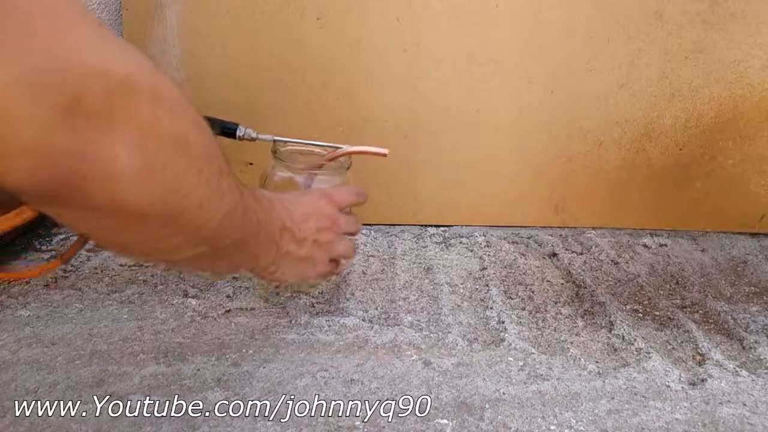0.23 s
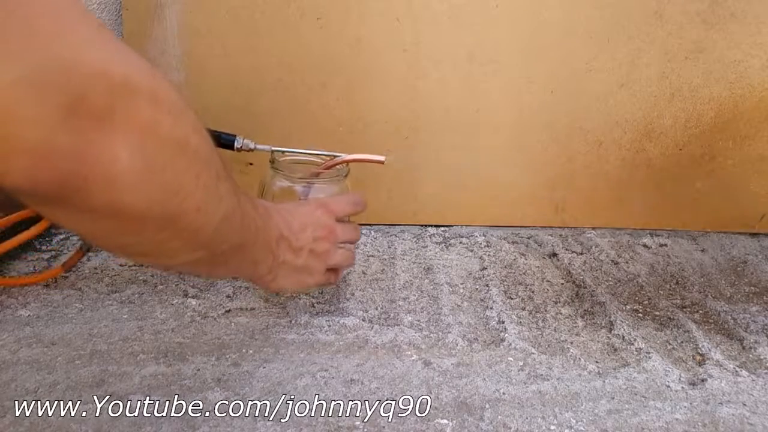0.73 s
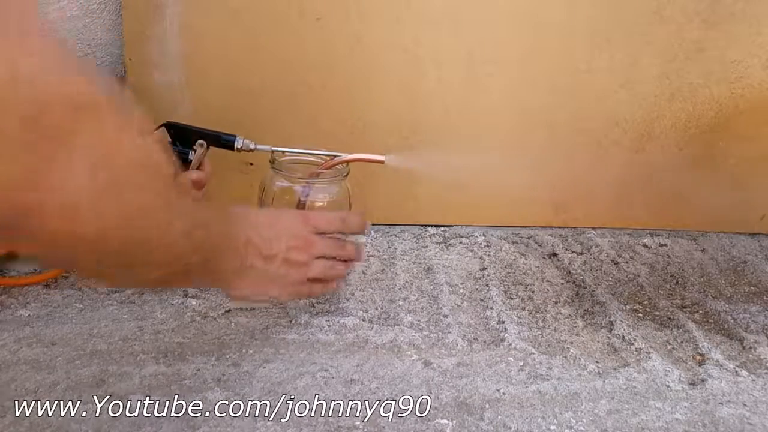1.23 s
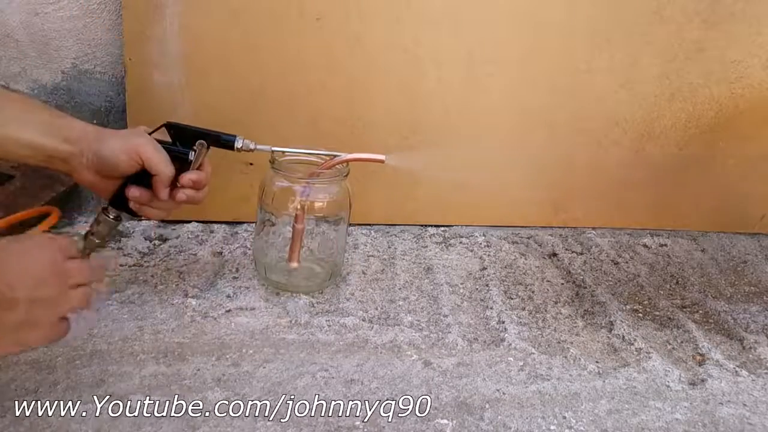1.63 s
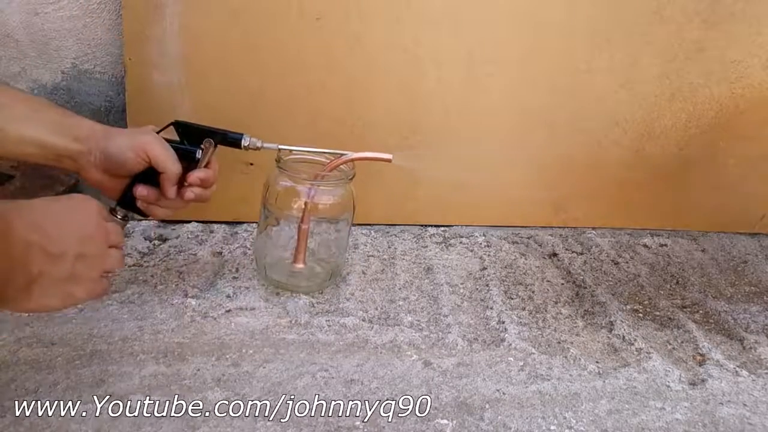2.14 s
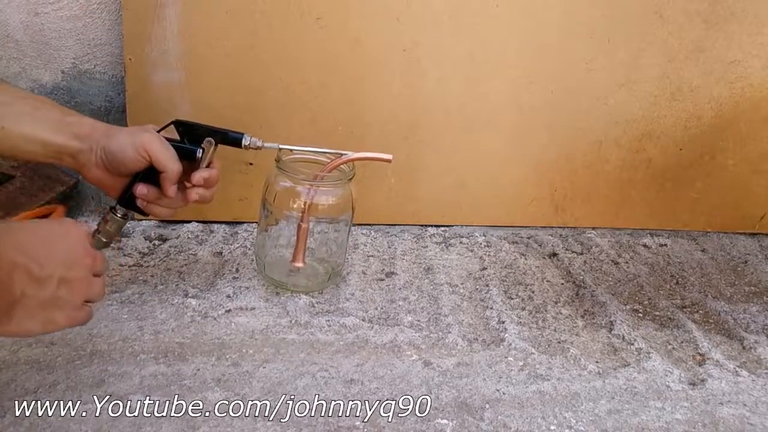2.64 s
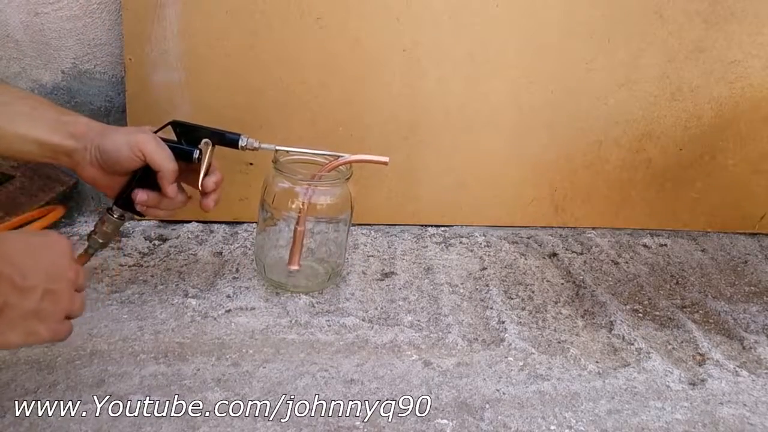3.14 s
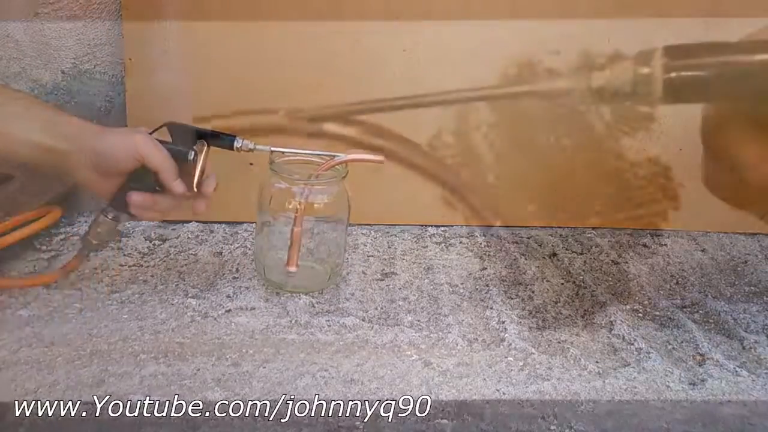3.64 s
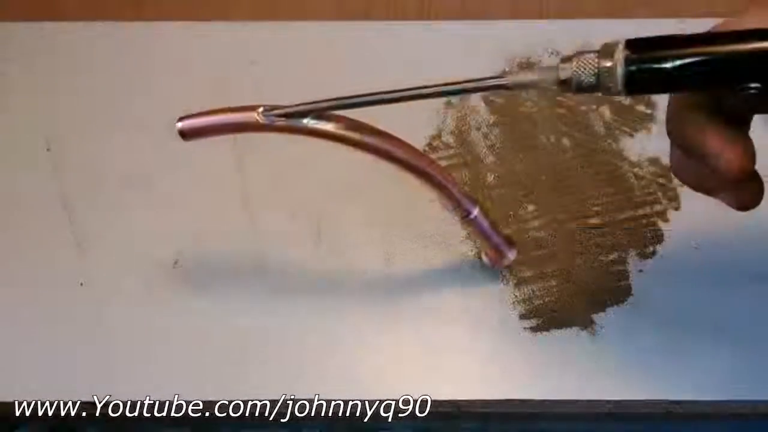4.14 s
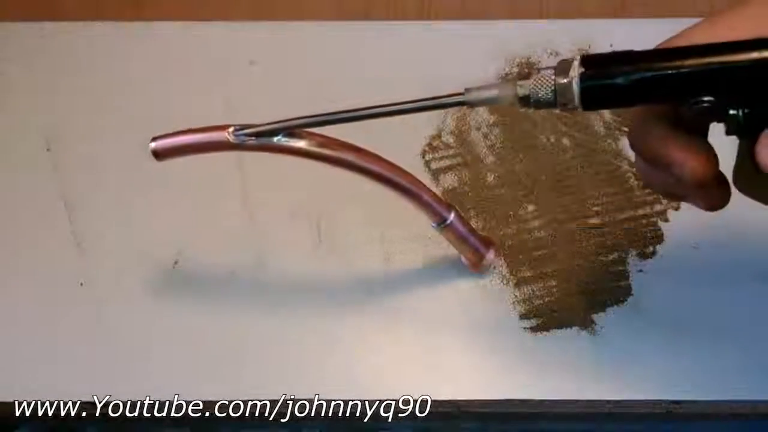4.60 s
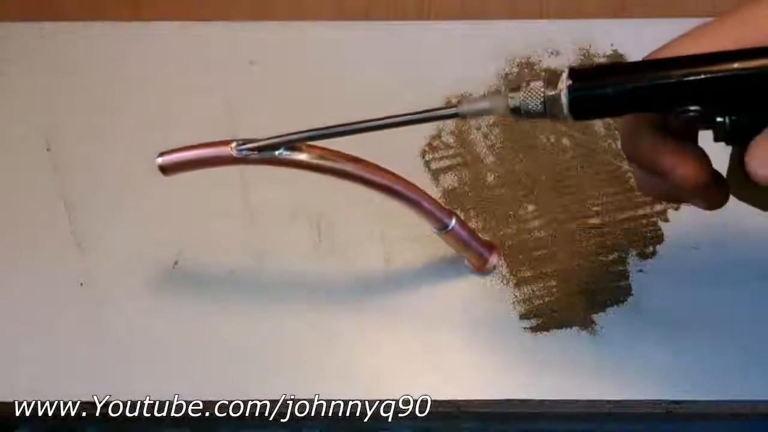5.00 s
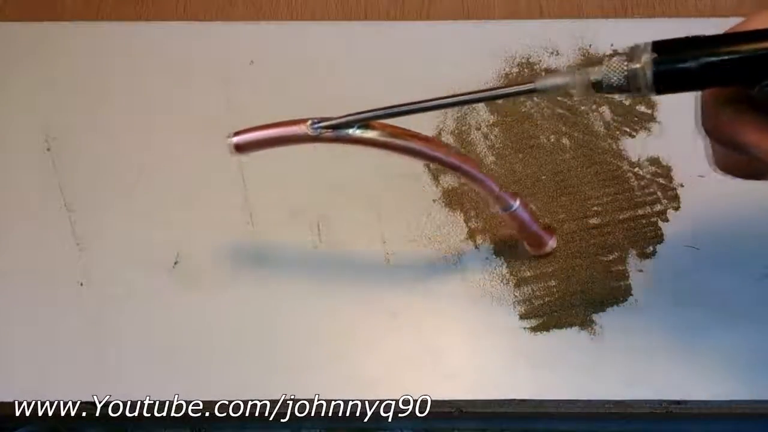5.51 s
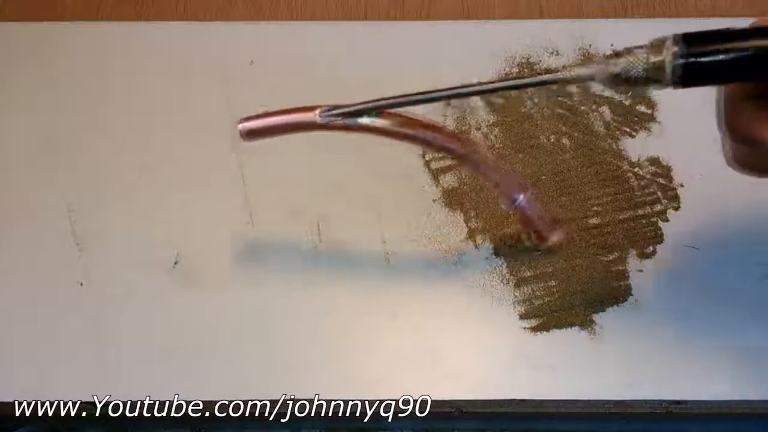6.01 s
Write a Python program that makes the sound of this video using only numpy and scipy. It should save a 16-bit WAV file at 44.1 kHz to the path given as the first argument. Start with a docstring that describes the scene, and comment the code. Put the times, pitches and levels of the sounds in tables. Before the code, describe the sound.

Stop-start air gun hiss with wet gurgle and valve thumps, a quiet gap of distant traffic and birds, then a singing jet swelling into full, buffeting hiss.

```python
"""In a yard, six pulls of an air gun blow through a bent copper tube that sucks water from a glass jar.
Filtered noise makes hiss, gurgle, rasp and mist; decaying sines make the thump and ring of each shut valve.
Between and after the last pulls come far bird chirps, swept sines, and a small tick; then the yard fades to a bench.
There the same tube sucks powder: its jet grows from singing to full hiss, and eddies jolt the left port.
Traffic noise and an engine drone lie beneath; the gun sits at the left port, which overloads."""
import sys
import numpy as np
from scipy import signal
from scipy.fft import rfft, irfft, next_fast_len
from scipy.io import wavfile
from scipy.ndimage import uniform_filter1d, map_coordinates

SR = 44100
rng = np.random.default_rng(int(sys.argv[2]) if len(sys.argv) > 2 else 0)


def unload_wav(signal):
    """Save mono or channel-first audio to the path in sys.argv[1] as 16-bit WAV at rate SR, clipped to [-1, 1]."""
    wavfile.write(
        sys.argv[1],
        SR,
        np.round(np.clip(np.atleast_2d(signal).T, -1, 1) * 32767).astype(np.int16),
    )


N = 276066
T = np.arange(N) / SR

# trigger pulls over the jar: valve opens t/s, valve shuts t/s, hose thump level/dB, glass ring level/dB
TRIGGER_PULLS = [(-.1, 0.056, -25, -46), (0.571, 0.812, -24.5, -25), (0.951, 2.508, -31.5, -41.5),
                 (2.701, 2.851, -23, -44), (2.892, 3.016, -22.5, -44), (3.073, 3.192, -23, -47.5)]


def amp(db):
    """Amplitude factor of a level in dB."""
    return 10 ** (np.asarray(db) / 20)


def unit(x):
    """Scale to rms 1 over all ports together."""
    return x / np.sqrt(np.mean(x ** 2) + 1e-20)


def along(points, hz):
    """Each column of (f/Hz, value, ..) points, interpolated on a log frequency axis."""
    f, *cols = np.transpose(points)
    return np.squeeze([np.interp(np.log(hz + 1), np.log(f + 1), c) for c in cols])


def curves(rows):
    """One value per sample for each column after the time."""
    s, *cols = np.transpose(rows)
    return [np.interp(T, s, c) for c in cols]


def wobble(rate):
    """A smooth random curve with rate knots a second."""
    return map_coordinates(rng.standard_normal(int(N * rate / SR) + 4), [T * rate])


def filtered(x, response):
    """Shape the spectrum of x by a response of frequency."""
    m = next_fast_len(N + SR // 2)
    spectrum = rfft(x, m) * response(np.fft.rfftfreq(m, 1 / SR))
    return irfft(spectrum, m)[..., :N]


def band(hz, centre_hz, width_hz):
    """Complex response of one resonance, peak gain 1."""
    return 1j * hz * width_hz / (centre_hz ** 2 - hz ** 2 + 1j * hz * width_hz)


def ringing(modes, t):
    """Sum of dying sines; each mode's strength varies at random from blow to blow."""
    ring = 0
    for hz, db, t60 in modes:
        level_db = db + rng.normal(0, 2.0) - 60 * t / t60
        ring = ring + amp(level_db) * np.sin(2 * np.pi * hz * t)
    return ring


def turbulence(alike, patchy_db, turn=0):
    """Patchy noise at two ports, more alike in the bass; the right lags by up to turn radians above it."""
    z = signal.stft(rng.standard_normal((2, N)), nperseg=512)[2]
    field = rng.standard_normal(z.shape[1:])
    field = uniform_filter1d(field, size=4, axis=0)  # patches spread over frequency
    field = uniform_filter1d(field, size=6, axis=1)  # and over time
    patchy = z * amp(patchy_db * unit(field))
    shared, separate = signal.istft(patchy, nperseg=512)[1][:, :N]

    like = lambda hz: np.clip(alike * (0.37 + .6 / (1 + (hz / 2300) ** 4)), 0, 1)
    lag = lambda hz: np.exp(-1j * turn / (1 + (1100 / (hz + 1)) ** 2.7))
    right = filtered(shared, lambda hz: like(hz) * lag(hz))
    right = right + filtered(separate, lambda hz: np.sqrt(1 - like(hz) ** 2))
    return np.array([shared, right])


def jet(colour, modes, noise, dull_db=0, thin_db=0):
    """Jet noise coloured by tube resonances, rms 1 at the left port; dull_db shifts the top, thin_db the bass."""
    rise = lambda hz: sum(np.outer(db, abs(band(hz, c, w)) ** 2) for c, w, *db in modes)
    top = lambda hz: dull_db / (1 + (12000 / (hz + 1)) ** 10)
    bass = lambda hz: thin_db / (1 + (hz / 3000) ** 4)
    x = filtered(noise, lambda hz: amp(along(colour, hz) + rise(hz) + top(hz) + bass(hz)))
    return x / np.std(x[0])


def valve(opens, shuts):
    """Air pressure 0-1: it builds when the valve opens and bleeds off when it shuts."""
    build_s, bleed_s = .0095, 0.0069
    up = 1 - np.exp(-(np.clip(T - opens, 0, 1) / build_s) ** 2)
    return up ** 2 * np.exp(-np.clip(T - shuts, 0, 1) / bleed_s)


def spray():
    """The air jet, water gurgling in jar and tube, a rasp where drops tear off and the fizz of the mist."""
    # jet colour at the ports: f/Hz, left relative level/dB, right relative level/dB
    colour = [(50, -43, -48), (300, -42, -36.5), (1010, -32, -30), (1530, -31, -31), (2790, -19.5, -31.5),
              (4530, -15, -28.5), (7000, -11.5, -26), (7830, -8, -25.5), (10100, -4, -23.5),
              (12500, -3, -23), (13300, -13, -18), (15350, -5.5, -16.5), (15820, -10, -21)]
    # tube resonances over the jar: f/Hz, width/Hz, left rise/dB, right rise/dB
    tube_modes = [(5700, 570, 4, 6.5), (7780, 110, 7.5, 3), (8795, 630, 7, -3.5), (10174, 1000, 7.5, -3),
                  (11100, 299, -1, -1.5), (12200, 440, 4, 1), (14400, 440, 5, -2)]
    # water in the tube, most in the long pull, less as the jar empties: t/s, rasp level/dB, mist level/dB
    water = [(0, -39.5, -33.5), (.58, -36.5, -32), (.65, -63, -40), (.81, -39, -29.5), (.96, -49, -31.5),
             (1.4, -43.5, -31.5), (1.6, -37, -30), (1.95, -34.5, -30.5), (2.5, -37, -36),
             (2.72, -41.5, -38.5), (3.2, -42, -41)]
    turn = 3.4  # radians by which the right port lags above the bass

    air = sum(valve(opens, shuts) for opens, shuts, *_ in TRIGGER_PULLS)
    rasp_db, mist_db = curves(water)

    cavity = lambda hz: band(hz, 521, 83) ** 2 + 0.34 * band(hz, 373, 60) ** 2
    uneven = amp(1.2 * wobble(30))
    gurgle = unit(uneven * filtered(turbulence(0.95, 0, turn=turn), cavity))

    tearing = lambda hz: band(hz, 1847, 239.5) ** 2
    rasp = unit(filtered(turbulence(0.96, 1.5, turn=2.9), tearing)) * amp([[6], [-1.5]])
    rasp = amp(rasp_db + 1.5 * wobble(14)) * rasp

    fizz = lambda hz: (abs(band(hz, 2410, 250)) ** 2
                       + 1.4 * abs(band(hz, 2890, 700)) ** 2
                       + 1.25 * abs(band(hz, 3560, 570)) ** 2)
    mist = unit(filtered(turbulence(0.71, 2.4, turn=turn), fizz)) * amp([[6], [-4]])

    hiss = jet(colour, tube_modes, turbulence(.8, 0.67, turn=turn))
    hiss = amp(-7.5 + 0.46 * wobble(29)) * hiss
    return air * (hiss + slugs() * gurgle + rasp + amp(mist_db) * mist)


def slugs():
    """Loudness of the gurgle: each water slug swells fast and dies slower over a steady simmer."""
    # water slugs that boom in the jar: t/s, peak level/dB
    booms = [(.03, -32), (.605, -36.5), (.81, -31), (1.035, -42.5), (1.165, -33.5), (1.275, -38),
             (1.375, -32.5), (1.543, -32), (1.63, -36.5), (1.695, -30), (1.84, -30.5), (2.02, -31),
             (2.18, -30), (2.235, -36), (2.43, -42), (2.755, -55.5), (2.915, -54.5), (3.02, -47),
             (3.19, -45.5)]
    rise_db_per_s, fall_db_per_s, simmer_db = 400, 169.5, -54.5
    s, db = np.transpose(booms)[:, :, None]
    slope = np.where(T < s, rise_db_per_s, fall_db_per_s)
    swells = amp(db - slope * abs(T - s))
    return np.sqrt(amp(simmer_db) ** 2 + np.sum(swells ** 2, axis=0))


def shutoff():
    """The closing valve thumps the hose and leaves the jar ringing, a little louder at the left port."""
    # thump modes of the hose: f/Hz, relative level/dB, t60/s
    hose_modes = [(194, -1.5, 0.11), (100.2, -4.5, 0.1), (30, -5.5, 0.082)]
    # ring modes of the glass jar: f/Hz, relative level/dB, t60/s
    glass_modes = [(565, -3, .2), (2374, -2, .18), (2410, -7, .09), (3900, -9, .1)]
    out, t = np.zeros(N + SR), np.arange(SR // 2) / SR
    onset = 1 - np.exp(-t / 0.0042)
    for _, shuts, thump_db, ring_db in TRIGGER_PULLS:
        thump = amp(thump_db) * ringing(hose_modes, t)
        ring = amp(ring_db) * ringing(glass_modes, t)
        out[round(shuts * SR):][:len(t)] += (thump + ring) * onset
    return out[:N] * amp([[1], [-1]])


def bench():
    """The dry jet grows from a singing low flow to a full hiss; each valve stage has its own resonances."""
    # powder jet colour at the ports: f/Hz, left relative level/dB, right relative level/dB
    colour = [(60, -34, -32), (300, -38, -28.5), (700, -26, -27.5), (1500, -22, -30), (3000, -15, -26.5),
              (5000, -12, -29), (6200, -10.5, -26), (8200, -4.5, -21), (10030, 1.5, -21.5),
              (12300, -4, -16), (13200, -5.5, -20), (15700, -10, -8)]
    # tube resonances at the bench: f/Hz, width/Hz, left rise/dB at low, middle and full flow, right rise/dB
    tube_modes = [(1950, 250, 12, 3, 0, 4), (3400, 450, 11, 4, 2, 3), (4620, 400, 10, 6, 3, 0),
                  (5650, 450, 11, 5, 1, 9), (7710, 300, 14, 10, 4, 8), (8380, 300, 4, 7, 2, 2),
                  (8930, 480, 18, 4, 1, 2), (10080, 400, 13, 11, 4, 6), (11150, 350, 0, 7, 2, 3),
                  (12400, 350, 2, 3, 1, 0), (13800, 400, 5, 5, 1, 3)]
    # air flow: t/s, jet level/dB, valve opening (0 low, 1 middle, 2 full)
    flow = [(4.85, -13, 0.49), (4.9, -8, 0.093), (4.975, -6, 0.082), (5.01, -6, 0.92), (5.3, -7.5, 1.56),
            (5.6, -7.5, 2.03), (6.26, -7.5, 1.93)]
    # low, middle and full flow: top shift/dB, bass shift/dB, right port level/dB
    stages = [(-30, -2.5, 0), (-3.5, -6.0, -1.5), (1.0, 2.5, -1)]

    jet_db, opening = curves(flow)
    out = 0
    for stage, (dull_db, thin_db, right_db) in enumerate(stages):
        modes = [(hz, width, rises[stage], rises[-1]) for hz, width, *rises in tube_modes]
        share = np.clip(1 - abs(np.clip(opening, 0, 2) - stage), 0, 1)  # crossfade between stages
        stage_jet = jet(colour, modes, turbulence(0, 1.3), dull_db, thin_db)
        out = out + np.sqrt(share) * stage_jet * amp([[0], [right_db]])
    pressure = valve(4.852, 99)  # opens and stays open to the end
    return pressure * amp(jet_db + 0.5 * wobble(13)) * out


def buffeting():
    """Eddies jolt the pressure at the left port, mostly downward, and it recovers; the smallest ones flutter."""
    # eddies on the left port: t/s, thud level/dB
    buffets = [(5.005, -46), (5.03, -36), (5.09, -31), (5.15, -42), (5.27, -28), (5.32, -22.5), (5.9, -22),
               (6.26, -17.5)]
    # largest eddies: t/s, strength of the downward push/dB
    gusts = [(5.024, 22), (5.068, 28), (5.103, 36), (5.215, 34), (5.239, 34), (5.315, 41), (5.334, 37),
             (5.357, 35), (5.423, 30), (5.471, 30), (5.665, 35.5), (5.70, 27), (5.828, 40.5), (6.052, 31)]
    eddies_per_s = 330
    flutter_db, flutter_follows = -11, 0.63  # the flutter swings less than the thuds

    thud_db, = curves(buffets)
    jolt = lambda centre_hz, width_hz: lambda hz: band(hz, centre_hz, width_hz) / (1 + 1j * hz / 450)
    struck = rng.random(N) < eddies_per_s / SR
    direction = np.sign(rng.random(N) - .75)  # three in four push down
    eddies = struck * direction * amp(3.5 * rng.exponential(1, N).clip(0, 2.2))

    large = np.zeros(N)
    for s, db in gusts:
        large[round(s * SR)] = -amp(db)
    thuds = amp(thud_db) * unit(filtered(eddies, jolt(33, 165))) + filtered(large, jolt(8.6, 40))

    flutter = filtered(rng.standard_normal(N), lambda hz: band(hz, 300, 1120))
    flutter = unit(amp(3.3 * wobble(60)) * flutter)
    flutter = amp(flutter_db + flutter_follows * thud_db) * flutter
    return (T > buffets[0][0]) * (thuds + flutter) * [[1], [0]]


def walls(x):
    """Reverberation as a decaying noise tail in which each frequency dies at its own speed."""
    # decay of the walls' answer: f/Hz, t60/s
    decay = [(200, 0.51), (1500, 0.33), (4000, 0.32), (7000, 0.27), (10000, 0.22), (15000, .15)]
    hz, t, z = signal.stft(rng.standard_normal((2, SR // 2)), SR, nperseg=256)
    dying = z * amp(-60 * t / along(decay, hz)[:, None])
    tail = signal.istft(dying, SR, nperseg=256)[1]
    return signal.fftconvolve(x, tail / np.linalg.norm(tail[0]), axes=1)[:, :N]


def tick():
    """One short dry tick: a dying sine with noise in it, louder at the left port."""
    # small tick: t/s, starting level/dB midway between the ports, f/Hz
    ticks = [(3.567, -52, 2210)]
    out, t = np.zeros(N), np.arange(round(.02 * SR)) / SR
    for s, db, hz in ticks:
        body = np.sin(2 * np.pi * hz * t) + 0.37 * rng.standard_normal(len(t))
        out[round(s * SR):][:len(t)] += amp(db - 60 * t / 0.037) * body
    return out * amp([[3], [-3]])


def birds():
    """Short rising chirps far off: swept sines under a bell-shaped envelope, louder at the left port."""
    # bird chirps: start t/s, peak level/dB midway between the ports, centre f/Hz
    chirps = [(2.6593, -62.5, 3720), (3.3119, -64, 3520), (3.4226, -65, 3410), (3.5229, -65.5, 3420),
              (3.6316, -62.5, 3500), (3.7344, -62, 3950), (3.8511, -64, 3700), (3.9489, -67, 3610)]
    length_s, sweep = 0.0183, 0.094  # sweep: share of the pitch each side of the centre
    out, t = np.zeros(N), np.arange(round(length_s * SR)) / SR
    for s, db, hz in chirps:
        pitch = hz * (1 + sweep * (2 * t / t[-1] - 1))
        chirp = np.hanning(len(t)) * np.sin(2 * np.pi * np.cumsum(pitch) / SR)
        out[round(s * SR):][:len(t)] += amp(db) * chirp
    return out * amp([[2.5], [-2.5]])


def background():
    """Noise for traffic, microphone hiss and the shut gun's leak fading in at the bench; a sine engine drone."""
    # traffic spectrum: f/Hz, relative level/dB per Hz
    traffic = [(12, -35.5), (25, 1), (50, -6), (95, -5.5), (150, -5.5), (250, -13), (500, -18.5),
               (1000, -32.5), (2000, -51.5), (4000, -120)]
    # engine drone: t/s, level/dB
    engine = [(0, -50), (.12, -45.5), (.8, -55), (1.36, -62), (1.51, -49), (1.62, -63), (1.92, -46),
              (2.36, -58), (2.52, -39), (2.8, -56), (3.12, -55), (3.26, -41.5), (3.45, -56), (3.56, -45),
              (3.75, -43), (3.94, -56), (4.2, -53.5), (4.42, -78)]
    # microphone noise spectrum: f/Hz, relative level/dB per Hz
    mic_noise = [(300, -5), (2000, -12), (8000, -12.5), (13000, -11), (15500, -6.5)]
    # leak of the shut gun: f/Hz, width/Hz, relative level/dB
    leak_modes = [(5150, 900, 1), (10100, 600, -3), (11600, 400, 2), (15000, 1200, 1)]
    at_bench = np.interp(T, (3.76, 4.5), [0, 1])  # fade between the scenes, in s

    # the traffic draws away, and is quieter at the bench
    start_db, sag_db_per_s, bench_drop_db = -50.5, 0.55, 7.5
    rush_db = start_db - sag_db_per_s * T - bench_drop_db * at_bench + 1.4 * wobble(4.5)
    rush = unit(filtered(turbulence(.9, -1.0), lambda hz: amp(along(traffic, hz))))

    drone_db, = curves(engine)
    base_hz, rise_hz_per_s = 53.7, 2.1
    drone_hz = base_hz + rise_hz_per_s * T + .6 * wobble(2.5)
    drone = amp(drone_db) * np.sin(2 * np.pi * np.cumsum(drone_hz) / SR)

    hiss = unit(filtered(rng.standard_normal((2, N)), lambda hz: amp(along(mic_noise, hz))))
    leak_colour = lambda hz: sum(amp(db) * abs(band(hz, c, w)) ** 2 for c, w, db in leak_modes)
    leak = unit(filtered(turbulence(0, .5), leak_colour))
    return amp(rush_db) * rush + drone + amp(-60.5) * hiss + amp([[-64], [-70]]) * at_bench * leak


def scene():
    """Gun, birds and tick, the walls' answer to gun and birds, the buffeted port and the background."""
    near = spray() + shutoff() + bench()
    far = birds()
    reverb = walls(amp([[-19], [-13]]) * near + amp(-3) * far)
    return near + far + tick() + reverb + buffeting() + background()


def record(dry):
    """The converter rounds off the loudest peaks, and a steep filter removes what lies above the band limit."""
    ceiling, top_hz = .94, 15780
    clipped = dry / (1 + abs(dry / ceiling) ** 6) ** (1 / 6)
    edge = lambda hz: .5 - .5 * np.tanh((hz - top_hz) / 50)
    return np.clip(filtered(clipped, edge), -1, 1)


dry = scene()
out = record(dry)
unload_wav(out)
```